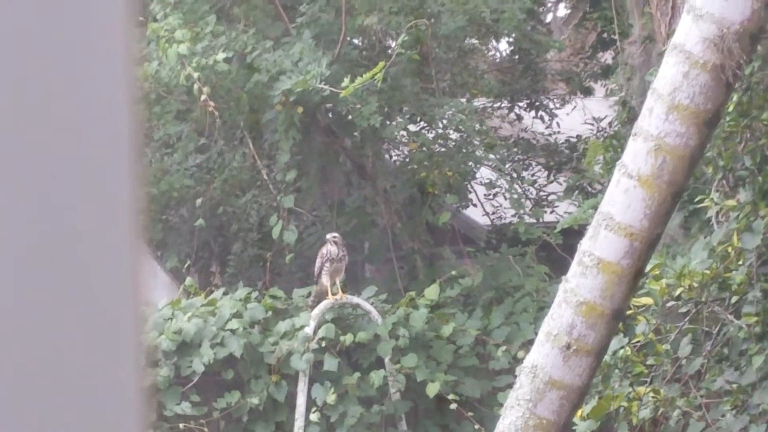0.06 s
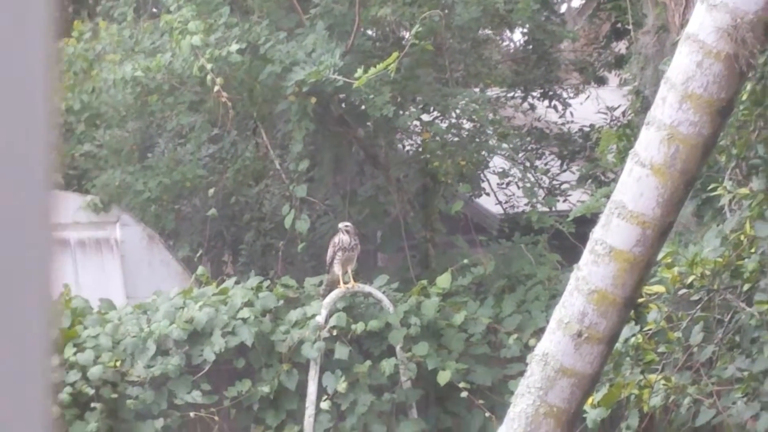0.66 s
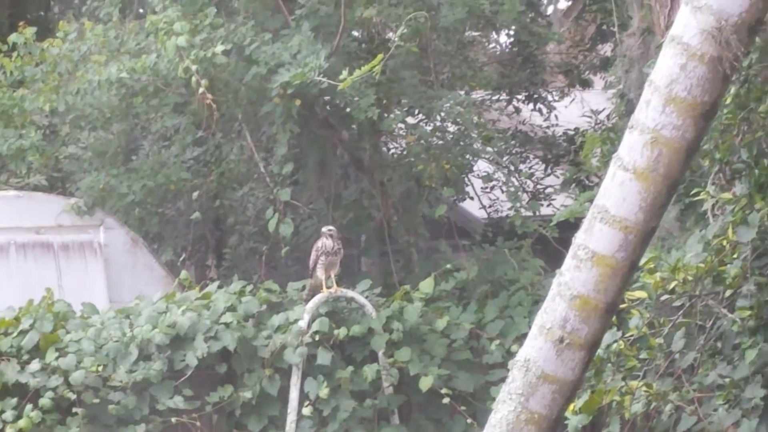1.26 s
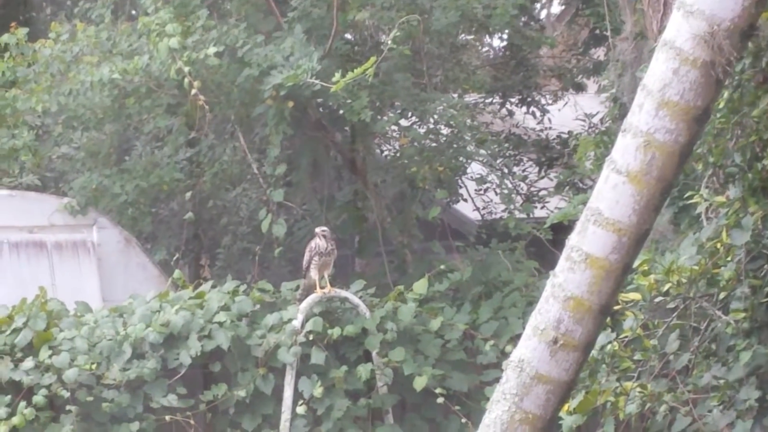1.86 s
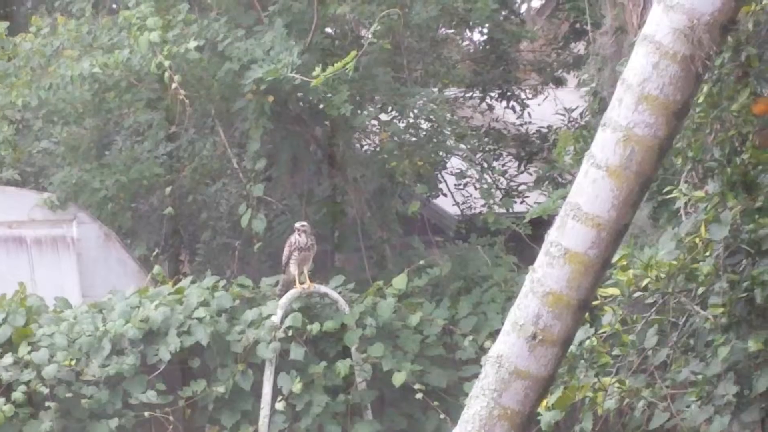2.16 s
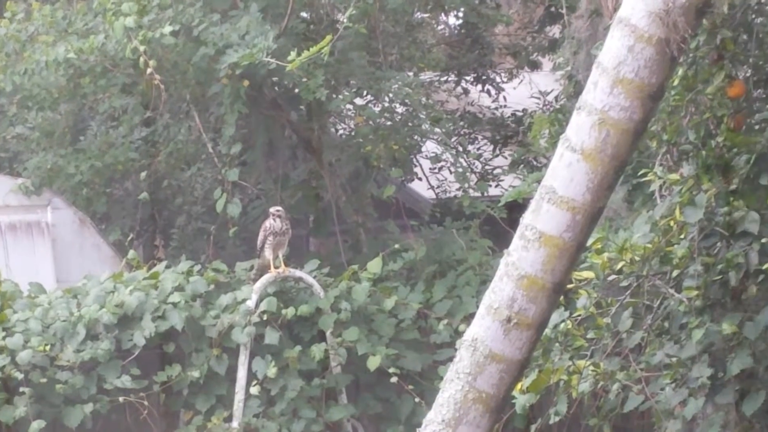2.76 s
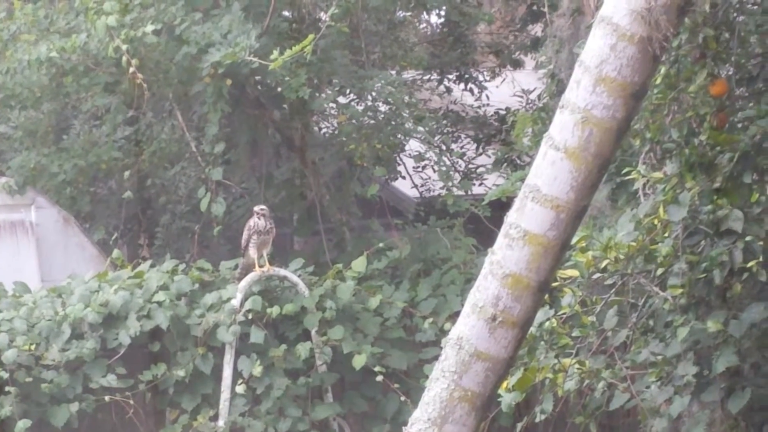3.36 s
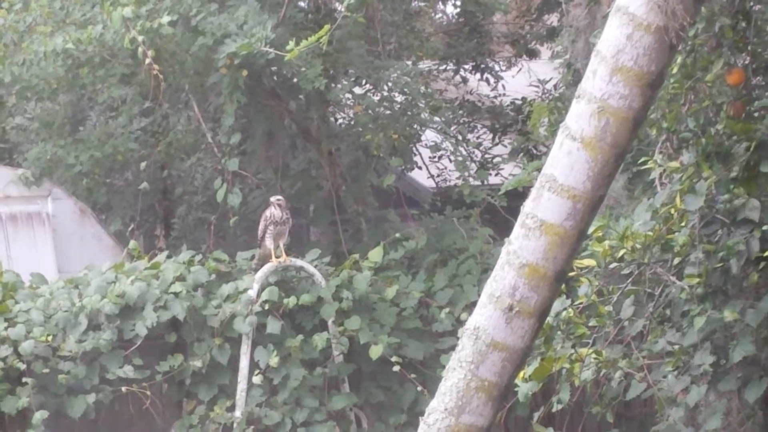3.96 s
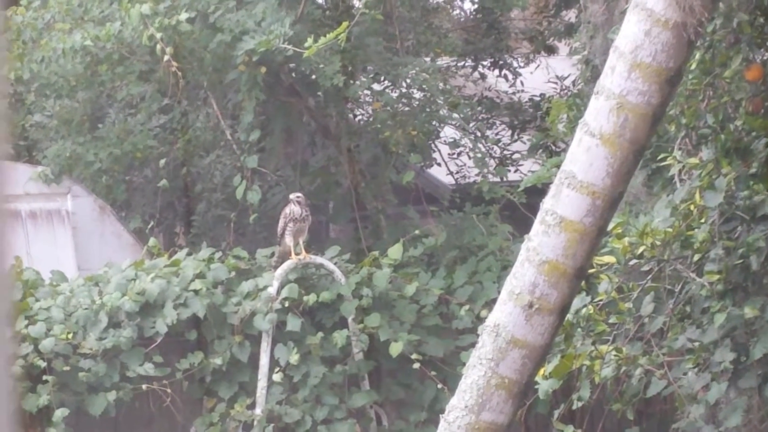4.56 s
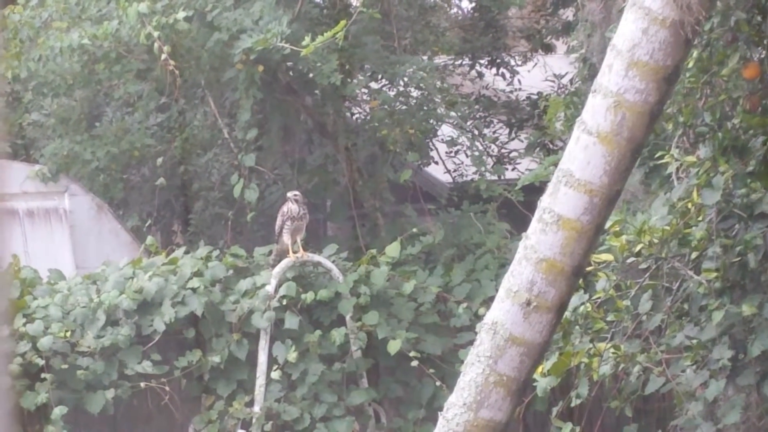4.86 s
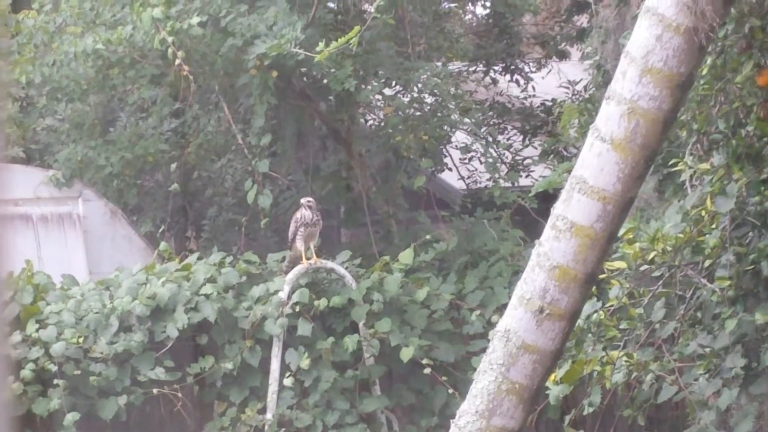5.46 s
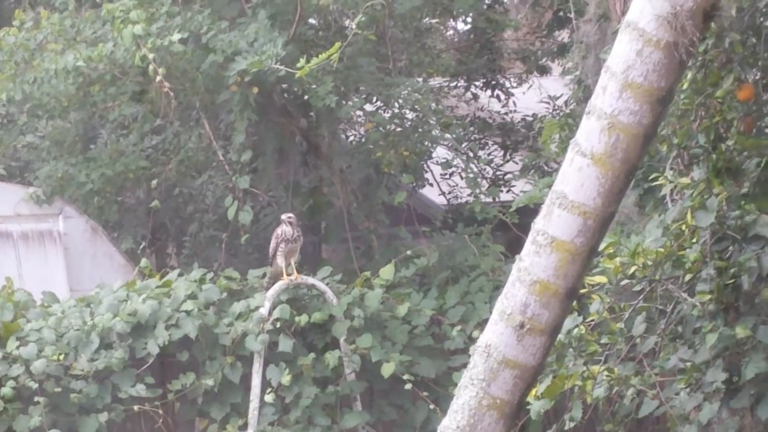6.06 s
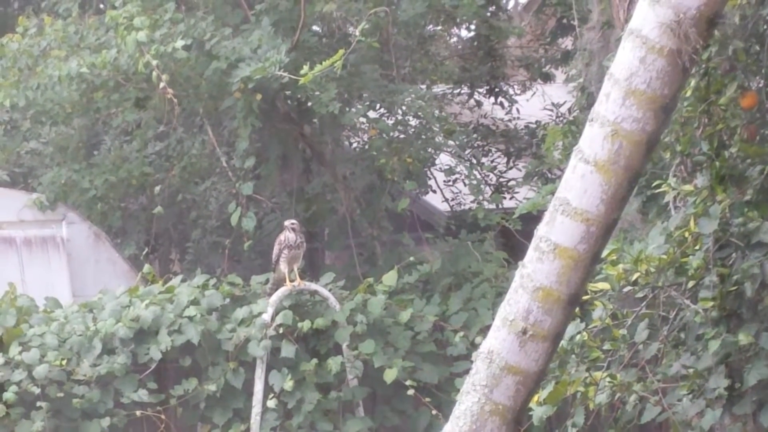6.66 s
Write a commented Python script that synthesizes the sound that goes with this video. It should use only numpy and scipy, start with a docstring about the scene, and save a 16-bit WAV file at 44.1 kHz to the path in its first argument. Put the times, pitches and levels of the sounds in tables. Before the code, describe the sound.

Heard from inside a house, two hawks call in quick turns outside, one with piercing, sagging squeals, the other with shorter, hoarse squawks. Faint ticks and thuds of fingers on the hand-held microphone fall among the calls. When the hawks stop, a little past halfway, distant small birds give a few chirps and three rising whistles over quiet room hum and hiss.

```python
"""Two hawks in the garden, from indoors

Two hawks scream in turn outside; each scream starts harsh, clears into a falling squeal and breaks up
again. Smaller birds chirp farther off. The stereo camera is hand-held inside the house, amid low rumble,
hum and hiss. It picks up faint bumps of the fingers, and its noise suppressor opens during the calls."""
import sys
import numpy as np
from scipy import signal
from scipy.fft import rfft, irfft, next_fast_len
from scipy.io import wavfile
from scipy.ndimage import uniform_filter1d

SR = 44100
rng = np.random.default_rng(int(sys.argv[2]) if len(sys.argv) > 2 else 0)


def digitize_waveform(pressure):
    """Quantize a signal to 16-bit integers and store it at the path in sys.argv[1].

    Rows of a 2-D input are taken as channels; values are limited to [-1, 1].
    """
    field = np.atleast_2d(pressure).T
    bounded = np.clip(field, -1, 1)
    quanta = np.round(bounded * 32767).astype(np.int16)
    wavfile.write(sys.argv[1], SR, quanta)


N = 295911


def amp(db):
    """Decibels to gain."""
    return 10 ** (np.asarray(db) / 20)


def unit(x):
    """Scale to rms 1."""
    return x / np.sqrt(np.mean(np.abs(x) ** 2) + 1e-20)


def along(points, hz):
    """(Hz, value) points read on a log axis."""
    f, v = np.transpose(points)
    return np.interp(np.log(hz + 1), np.log(f + 1), v)


def step(x):
    """A soft switch from 0 to 1 around x = 0."""
    return .5 + .5 * np.tanh(x)


def progress(t, start, length):
    """0 before start, 1 after length more seconds."""
    return np.clip((t - start) / length, 0, 1)


def add(track, s, sound):
    """Mix a sound into a track from time s."""
    part = track[..., max(0, round(s * SR)):][..., :sound.shape[-1]]
    part += sound[..., :part.shape[-1]]


def filtered(x, response):
    """x times a response of frequency."""
    n = x.shape[-1]
    m = next_fast_len(n + 8192)
    return irfft(rfft(x, m) * response(np.fft.rfftfreq(m, 1 / SR)), m)[..., :n]


def panned(x, balance):
    """Share each frequency between left and right."""
    return filtered(x, lambda hz: amp(np.outer([.5, -.5], along(balance, hz))))


def noise(shape, response):
    """Noise of rms 1, coloured by a response of frequency."""
    return unit(filtered(rng.standard_normal(shape), response))


def flutter(shape, width_hz):
    """Random motion of rms 1, mostly slower than width_hz."""
    return noise(shape, lambda hz: np.exp(-(hz / width_hz) ** 2))


def roughened(phase, rough, width_hz):
    """Tones of rms 1, with a share of their power smeared into a band around them."""
    rough = np.clip(rough, 0, 1)
    smear = flutter(phase.shape, width_hz) * np.sin(phase)
    smear += flutter(phase.shape, width_hz) * np.cos(phase)
    return np.sqrt(2 * (1 - rough)) * np.sin(phase) + np.sqrt(rough) * smear


def room_tone(rumble_db=-55.5, hum_gain_db=5, hiss_db=-59):
    """Steady rumble, appliance hum and hiss in the room around the microphones."""
    # Each row: frequency in Hz, relative level in dB.
    rumble_spectrum = [(22, -36), (43, -3.5), (58, -4), (72, -5.5), (94, 0.5), (125, -8), (175, -3),
                       (210, -13.5), (300, -16), (400, -24.5), (560, -26), (700, -45.5), (1200, -34.5),
                       (2600, -51)]
    hum_partials = [(58.5, -72.5), (117, -64.5), (294, -68.5)]
    hiss_spectrum = [(410, -2), (700, -4), (872, -6.5), (1030, -6.5), (1110, -9), (1200, -6), (1600, -7),
                     (2350, -9.5), (2680, -6.5), (3040, -6), (3740, -12), (4660, -5.5), (6860, 0.5),
                     (8220, -10.5), (15300, -10)]
    # Each row: frequency in Hz, side over mid in dB.
    rumble_width = [(40, -11.5), (90, -10), (170, -7), (500, -4)]
    # Each row: frequency in Hz, left over right in dB.
    hiss_balance = [(700, 3), (2000, 2), (4500, -0.5), (5400, -5.5), (6500, -11.5), (7500, -10.5),
                    (9000, -0.5), (14000, -2)]
    t = np.arange(N) / SR
    mid, side = noise((2, N), lambda hz: amp(along(rumble_spectrum, hz)))
    side = filtered(side, lambda hz: amp(along(rumble_width, hz)))
    rumble = amp(rumble_db + 1.6 * flutter(N, 3.9)) * np.array([mid + side, mid - side])
    hum = sum(amp(db + hum_gain_db) * roughened(2 * np.pi * hz * t, 0.13, 1.33)
              for hz, db in hum_partials)
    hiss = amp(hiss_db) * noise((2, N), lambda hz: amp(along(hiss_spectrum, hz)))
    return (rumble + hum) * amp([[.9], [-.9]]) + panned(hiss, hiss_balance)


def fades(t, attack_s=0.034, attack_db=10.5, release_s=0.039, release_db=12):
    """Attack, hold and release of a hawk's call, in dB."""
    attack = attack_db * (progress(t, 0, attack_s) - 1)
    return attack - release_db * progress(t, t[-1] - release_s, release_s)


def scream(t, pitch, level_db, upper_db, break_s, throat, *, clear_rough, harsh_rough,
           rasp_db, halves_db, thirds_db, flicker_db, wander, shake_db):
    """Partials of a hawk's syrinx slide through the fixed resonances of its throat."""
    harsh_s, dip_s = 0.0494, 0.006  # harsh opening; brief softening of the rasp as the voice breaks
    clear = step((t - harsh_s) / 0.0081) * step((break_s - t) / 0.0062)
    harsh = harsh_rough + 0.43 * step((harsh_s - t) / 0.011)
    rough = harsh + (clear_rough - harsh) * clear
    waver = wander * flutter(len(t), 30.4) + 0.0276 * rough * flutter(len(t), 193)
    phase = 2 * np.pi * np.cumsum(pitch * (1 + waver)) / SR
    # The vibration repeats every second cycle early on, every third cycle later.
    late = step((t - harsh_s - .09) / 0.016)
    whole = np.arange(1, 12)
    series = [(whole, 1),
              (whole + 1 / 2, amp(halves_db) * (1 - late) * clear),
              (np.r_[whole + 1 / 3, whole + 2 / 3], amp(thirds_db) * late * clear)]
    multiple = np.concatenate([m for m, _ in series])[:, None]
    # The throat's peak stands out most once the tone has settled.
    focus = 0.72 + 0.2 * clear * late
    gains = np.vstack([g * amp(focus * along(throat, np.outer(m, pitch))) for m, g in series])
    gains *= amp(flicker_db * flutter(gains.shape, 28))
    # Overtones above 4300 Hz are rougher and have their own level.
    upper = step((multiple * pitch - 4300) / 250)
    share = lambda w: w / np.linalg.norm(w, axis=0)
    gains = share(gains * (1 - upper)) * amp(level_db) + share(gains * upper) * amp(upper_db)
    voice = np.sum(gains * roughened(multiple * phase, rough + 0.58 * upper, 86), axis=0)
    # Where the vibration turns chaotic, noise fills the throat and the voice rattles.
    rasp = noise(len(t), lambda hz: amp(0.39 * along(throat, hz)))
    dip = np.exp(-((t - break_s) / dip_s) ** 2)
    voice += rasp * amp(level_db + rasp_db - 2 * dip) * np.sqrt(np.abs(rough) + 0.033 * dip)
    rattle_db = 1.4 * (1 - clear) * flutter(len(t), 170)
    voice *= amp(rattle_db + shake_db * flutter(len(t), 28))
    return voice * np.clip(np.minimum(t - t[0], t[-1] - t) / 0.0039, 0, 1)


def squeal(rise, glide, tail, collapse, from_hz, to_hz, overshoot_hz, db, flare_db):
    """First hawk: the pitch leaps, overshoots, sags as the voice grows, then collapses as it breaks."""
    # Resonances of throat and beak. Each row: frequency in Hz, relative gain in dB.
    throat = [(650, -22), (980, -16.5), (1170, -19), (1600, -18), (1950, -9.5), (2250, 3), (2700, -1),
              (3500, -17.5), (4200, -28), (5400, -13.5), (6800, -16.5), (8000, -23.5), (9000, -62),
              (15000, -71)]
    start_hz, slack_hz, settle_s = 1064, 742, .04
    crescendo_db, break_drop_db = 1.5, 6
    t = np.arange(0, rise + glide + tail, 1 / SR)
    sag = progress(t, rise, glide)
    since_break = np.maximum(t - rise - glide, 0)
    overshoot = overshoot_hz * np.exp(-np.maximum(t - rise, 0) / settle_s)
    held = from_hz + (to_hz - from_hz) * sag + overshoot
    pitch = held + (start_hz - held) * (1 - progress(t, 0, rise)) ** 1.7
    pitch = slack_hz + (pitch - slack_hz) * np.exp(-since_break / collapse)
    level_db = db - crescendo_db * (1 - sag) - break_drop_db * progress(since_break, 0, 0.004)
    # The upper overtones flare as the voice clears.
    upper_db = -62 + flare_db * np.exp(-((t - 0.061) / 0.039) ** 2)
    return scream(t, pitch, level_db + fades(t), upper_db + fades(t), rise + glide, throat,
                  clear_rough=0.036, harsh_rough=.34, rasp_db=-4, halves_db=-14, thirds_db=-13,
                  flicker_db=3.5, wander=0.0023, shake_db=0)


def first_hawk():
    """A piercing bird with undertones, out in the garden."""
    # Each row: start, rise, glide, tail and collapse time in seconds; glide start, glide end and
    # overshoot in Hz; relative level and overtone flare in dB.
    calls = [(.03, 0.06, 0.31, .12, 0.039, 1185, 1098, 90.6, -46, 3.5),
             (.908, 0.055, 0.36, 0.077, .02, 1267, 1125, 96.4, -44, 15),
             (1.745, .055, .374, .07, .02, 1304, 1124, 55, -43, 18),
             (2.59, 0.077, .235, .155, .09, 1312, 1240, 129.5, -44, 12.5)]
    out = np.zeros((2, N))
    for s, *shape in calls:
        add(out, s, amp([[.5], [-2.5]]) * squeal(*shape))
    return out


def bumps_and_swells(touch_count=6, touch_db=-54, tick_t60_s=0.05, thud_t60_s=0.069):
    """Fingers bump the camera, each time a dry tick over a dull thud; soft bands of noise swell."""
    # Each row: start in seconds, relative level in dB, extra gain of the thud in dB.
    bumps = [(0.199, -39.5, -17), (.485, -39.5, -4), (.612, -45.5, -15), (0.77, -43.5, -5),
             (0.83, -42.5, 0.5), (.907, -38, -1), (1.422, -43, -7), (1.474, -34, -5.5), (1.788, -51, 10.5),
             (2.363, -47.5, 12.5), (2.482, -40.5, 3.5), (2.585, -39, -2.5), (3.037, -43.5, 2),
             (5.801, -51.5, 7)]
    # Colour of a tick on the case. Each row: frequency in Hz, relative level in dB.
    case = [(100, -63), (250, 1.5), (450, 0), (700, -5), (1300, -15), (2500, -10.5), (6000, -33),
            (15000, -32)]
    # Short rustles of the hand, and one long, low swell of the room's rumble.
    # Each row: start and length in seconds, centre in Hz, relative level in dB.
    swells = [(0.55, 0.17, 2360, -62.5), (0.65, 0.16, 98, -48), (2.28, 0.26, 139, -44),
              (2.355, 0.025, 6400, -49), (1.9, 1.36, 66, -53.5), (.755, 0.082, 2460, -54.5),
              (5.215, .075, 5500, -60), (5.545, 0.059, 5600, -59), (5.458, 0.018, 2200, -59),
              (6.1, 0.14, 510, -66), (6.185, .14, 1660, -63.5)]
    out = np.zeros(N)
    t = np.arange(SR // 6) / SR
    touches = [(s, touch_db, 0) for s in rng.uniform(.3, 3.1, touch_count)]
    for s, db, thud_db in bumps + touches:
        tick = noise(len(t), lambda hz: amp(along(case, hz)))
        thud = noise(len(t), lambda hz: np.exp(-((hz - 160) / 100) ** 2))
        add(out, s, tick * amp(db - 6 - 60 * t / tick_t60_s))
        add(out, s, thud * amp(db + thud_db - 2 - 60 * t / thud_t60_s))
    for s, length, centre_hz, db in swells:
        swell = np.hanning(int(length * SR))
        band = noise(len(swell), lambda hz: 1 / (1 + (np.log((hz + 1) / centre_hz) / 0.26) ** 2))
        add(out, s, amp(db) * swell * band)
    return out * amp([[2.5], [-2.5]])


def chirp(length, start_hz, end_hz, db, rough, bend=1):
    """A small bird's short gliding whistle with a burr."""
    u = np.linspace(0, 1, int(length * SR))
    pitch = start_hz * (end_hz / start_hz) ** (u ** bend)
    phase = 2 * np.pi * np.cumsum(pitch) / SR
    envelope = np.abs(np.sin(np.pi * u ** 0.83)) ** 0.27
    return amp(db) * envelope * roughened(phase, rough, 0.07 * start_hz)


def small_birds(whistle_s=.075, thin_hz=2615, thin_db=-81.5):
    """Farther off: scattered notes, a rising whistle that ends on a level note, and a thin tone."""
    # Each row: start and length in seconds, first and last pitch in Hz, relative level in dB,
    # roughness (all noise from 1 up).
    notes = [(0.37, 0.028, 3400, 2910, -55, 0.6), (0.757, 0.031, 3040, 3280, -52.5, 0.8),
             (0.795, 0.046, 3448, 2605, -54.5, 1.2), (3.903, 0.051, 2347, 2052, -53.5, 0.63),
             (4.02, 0.056, 2425, 2182, -53.5, 0.6), (4.137, 0.079, 2706, 3100, -57.5, 0.54),
             (4.26, 0.056, 3095, 2910, -55.5, .35), (4.398, 0.048, 2330, 2116, -55, 0.3),
             (6.542, 0.057, 3960, 2860, -63.5, 1.11)]
    # Each row: start in seconds, relative level in dB.
    whistles = [(5.024, -63.5), (5.34, -59), (5.694, -56.5)]
    out = np.zeros(N)
    for s, *note in notes:
        add(out, s, chirp(*note))
    for s, db in whistles:
        add(out, s, chirp(whistle_s, start_hz=2065, end_hz=3460, db=db, rough=0.38, bend=1.1))
        add(out, s + .8 * whistle_s, chirp(0.077, start_hz=2700, end_hz=2700, db=db - 5.5, rough=0.42))
    thin_tone = roughened(2 * np.pi * thin_hz * np.arange(N) / SR, 0.45, 25)
    return out + thin_tone * amp(thin_db + 2.5 * flutter(N, 1.3))


def squawk(rise, fall, tail, top_hz, break_hz, db, upper_db, rough):
    """Second hawk: the pitch arches, brightest at the top, then drops into a hoarse yelp."""
    # Resonances of throat and beak. Each row: frequency in Hz, relative gain in dB.
    throat = [(600, -57), (1150, -10), (1600, -5.5), (2000, -11), (2350, 15.5), (2800, 4), (3400, -5),
              (4100, -23), (4700, -20.5), (5300, -1.5), (6400, -5.5), (7700, -11.5), (9000, -61),
              (15000, -62)]
    start_hz, slack_hz, collapse_s = 1144, 1081, 0.034
    yelp_db, dull_db = 4.5, 14  # gain of the yelp; overtones lost at slack pitch
    t = np.arange(0, rise + fall + tail, 1 / SR)
    since_break = np.maximum(t - rise - fall, 0)
    held = top_hz + (break_hz - top_hz) * progress(t, rise, fall) ** 0.92
    pitch = start_hz + (held - start_hz) * np.sin(np.pi / 2 * progress(t, 0, rise))
    pitch = slack_hz + (pitch - slack_hz) * np.exp(-since_break / collapse_s)
    slack = (top_hz - pitch) / (top_hz - slack_hz)
    level_db = db + yelp_db * progress(since_break, 0, 0.0048)
    upper_db = upper_db - dull_db * slack ** 2
    return scream(t, pitch, level_db + fades(t), upper_db + fades(t), rise + fall, throat,
                  clear_rough=rough, harsh_rough=0.31, rasp_db=-3.5, halves_db=-32.5, thirds_db=-49,
                  flicker_db=4.5, wander=0.00967, shake_db=1.5)


def second_hawk():
    """A higher, hoarser bird answers from a little to the right of the first."""
    # Each row: start, rise, fall and tail in seconds; top and break pitch in Hz; relative levels of
    # voice and upper overtones in dB; roughness from 0 to 1.
    calls = [(1.439, .11, .14, 0.071, 1680, 1345, -50, -54.5, 0.15),
             (2.18, 0.098, 0.17, 0.079, 1708, 1386, -48.5, -52, 0.21),
             (2.84, .095, 0.17, .085, 1731, 1390, -50, -51.5, 0.3),
             (3.489, 0.077, 0.21, 0.077, 1648, 1423, -50.5, -51, 0.15)]
    out = np.zeros((2, N))
    for s, *shape in calls:
        add(out, s, amp([[-2.3], [-.8]]) * squawk(*shape))
    return out


def garden_echoes(x):
    """Diffuse answer of trees and walls, different at each microphone."""
    # Each row: frequency in Hz, seconds to die away by 60 dB.
    decay_times = [(500, 0.96), (2500, 0.39), (7000, 0.87), (14000, 0.07)]
    hz, t, spectrum = signal.stft(rng.standard_normal((2, SR // 2)), SR, nperseg=256)
    decay = amp(-60 * t / along(decay_times, hz)[:, None])
    tail = signal.istft(spectrum * decay, SR, nperseg=256)[1]
    return signal.fftconvolve(np.atleast_2d(x), tail / np.linalg.norm(tail[0]), axes=1)[:, :N]


def walls(x, count=14):
    """Early reflections off the window frame and walls: gliding tones beat against them."""
    taps = np.zeros((2, SR // 20))
    for mic in taps:
        mic[rng.integers(SR // 1000, SR // 50, count)] = rng.choice([-1, 1], count) / np.sqrt(count)
    return signal.fftconvolve(np.atleast_2d(x), taps, axes=1)[:, :N]


def window(x):
    """Narrow resonances of the window and room make a sliding tone swell and dip."""
    # Each row: centre in Hz, width in Hz, boost or cut in dB.
    resonances = [(1407, 23, 5.5), (1658, 41, 6.5), (2239, 45, 10.5), (2281, 54, -6.5), (2338, 57, 8.5),
                  (2490, 44, -2), (2465, 28, 5.5), (2588, 37, 4), (2700, 64, -4), (2835, 27, 10),
                  (3055, 43, 5), (3422, 35, 4.5), (6370, 93, 4), (6570, 37, 4)]

    def peak(hz, centre, width, db):
        detuning = centre ** 2 - hz ** 2
        return (detuning + 1j * hz * width * amp(db)) / (detuning + 1j * hz * width)

    return filtered(x, lambda hz: np.prod([peak(hz, *row) for row in resonances], axis=0))


def scene():
    """From inside the house: the birds reach the two microphones with different colour and phase."""
    # Each row: frequency in Hz, lead of the left microphone in radians.
    bird_phase = [(600, 1), (1400, -1.57), (2300, -1.37), (3200, -1.53), (6500, -1.73), (14000, 1)]
    # Each row: frequency in Hz, left over right in dB.
    bird_balance = [(700, -12), (1400, 6), (2300, 3.5), (3200, -1), (4400, 2), (6500, -12.5), (8000, -16),
                    (14000, -25)]
    near = first_hawk() + second_hawk()
    far = small_birds()
    direct = filtered(near + far, lambda hz: np.exp(1j * np.outer([.5, -.5], along(bird_phase, hz))))
    garden = amp(-11) * garden_echoes(near) + amp(-7.5) * garden_echoes(far)
    birds = window(direct + amp(-6) * walls(near + far) + garden)
    return panned(birds, bird_balance) + bumps_and_swells() + room_tone()


def suppressor(x, shut_db=-72, open_db=-31.5, depth_db=9.5, follow_s=0.049, bass_share=0.99):
    """The camera turns everything down while the calls' band is quiet, the bass a shade less."""
    band = filtered(x, lambda hz: (hz > 1000) & (hz < 4000))
    power = uniform_filter1d(np.mean(band ** 2, axis=0), SR // 30)
    level_db = 10 * np.log10(np.abs(power) + 1e-20)
    target = np.interp(level_db, [shut_db, open_db], [0, 1])
    pole = np.exp(-1 / (follow_s * SR))
    opening = signal.lfilter([1 - pole], [1, -pole], target)
    gain_db = depth_db * (opening - 1)
    bass = filtered(x, lambda hz: 1 - step((hz - 260) / 60))
    return bass * amp(bass_share * gain_db) + (x - bass) * amp(gain_db)


def record(dry):
    """The camera suppresses noise and keeps nothing above its band limit."""
    return filtered(suppressor(dry), lambda hz: hz < 15450)


dry = scene()
out = record(dry)
digitize_waveform(out)
```